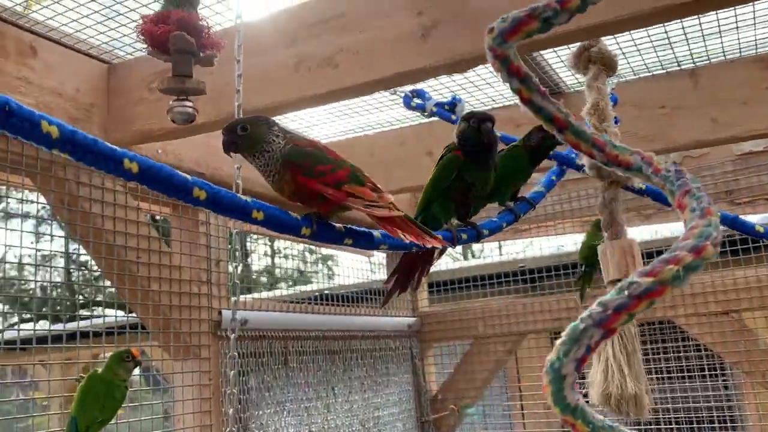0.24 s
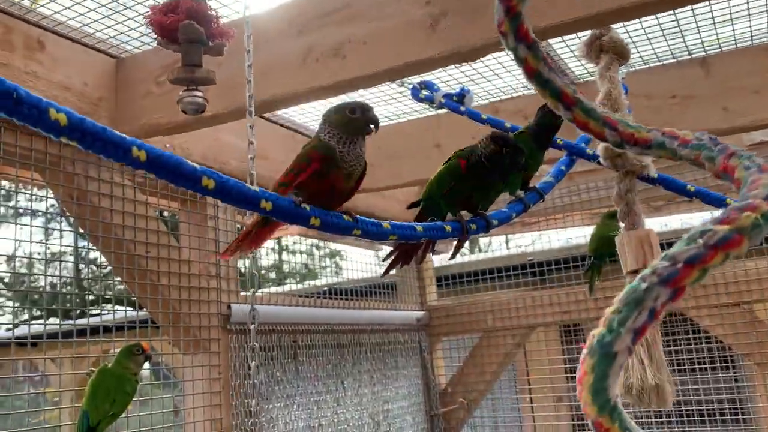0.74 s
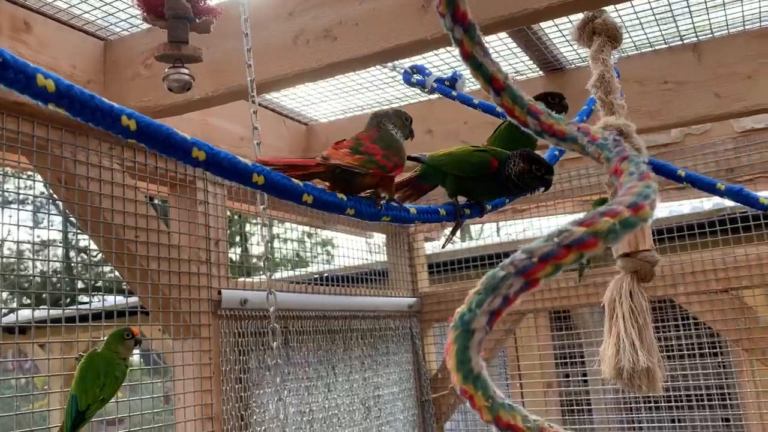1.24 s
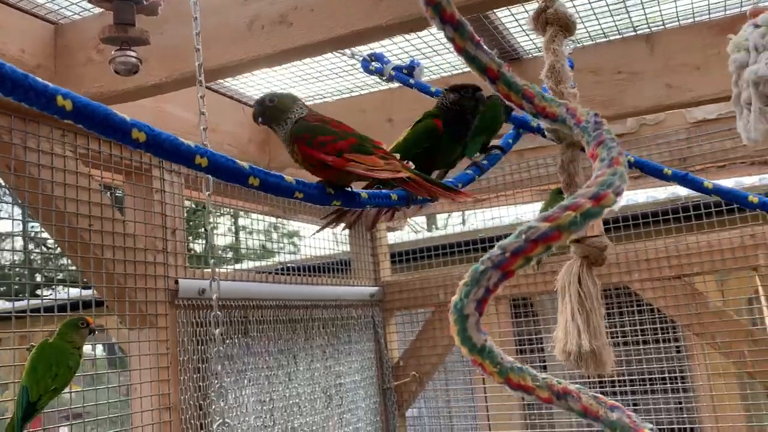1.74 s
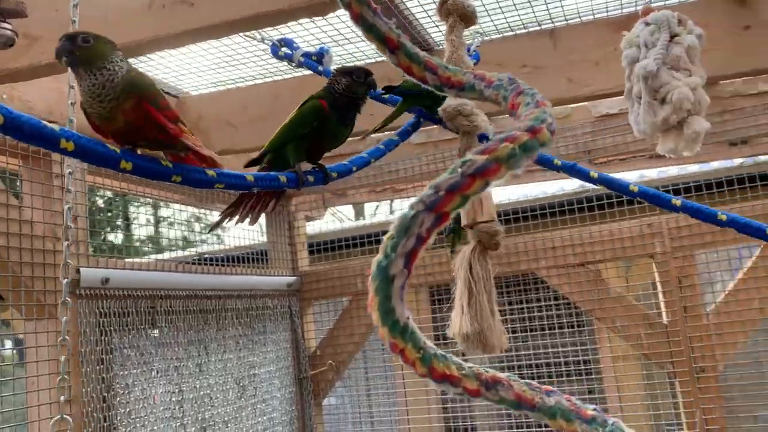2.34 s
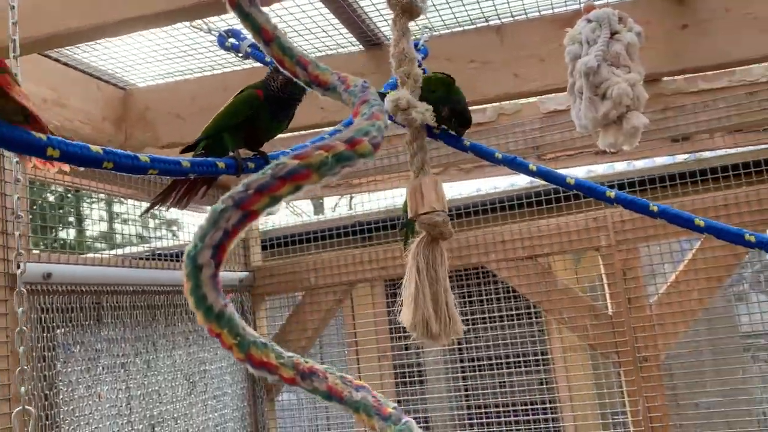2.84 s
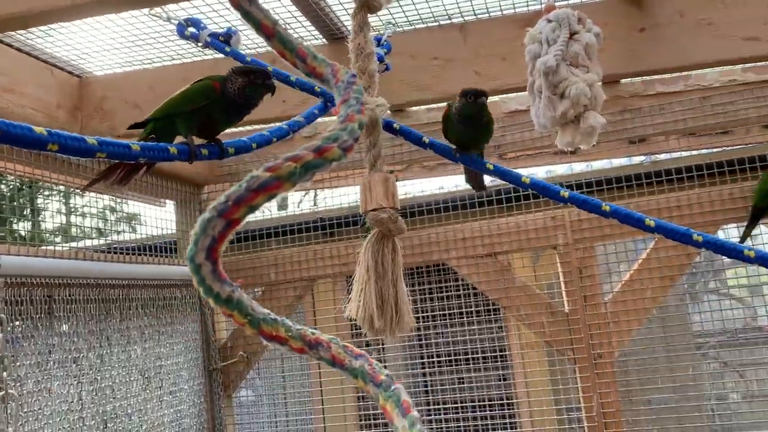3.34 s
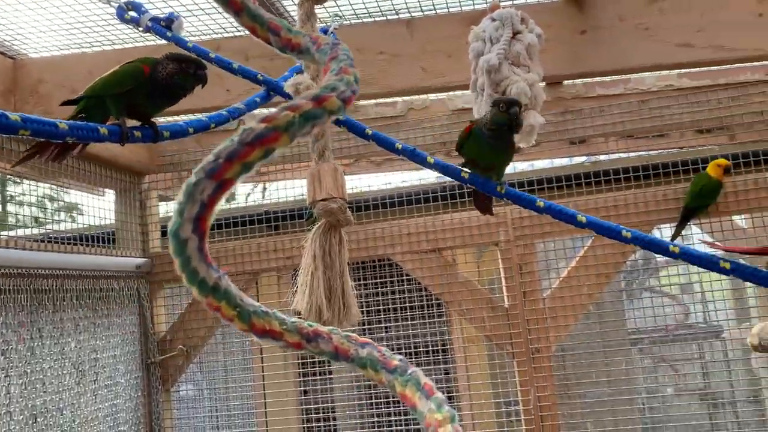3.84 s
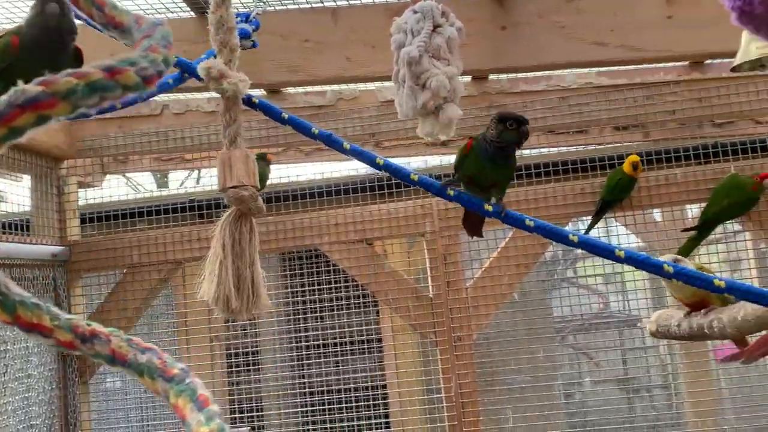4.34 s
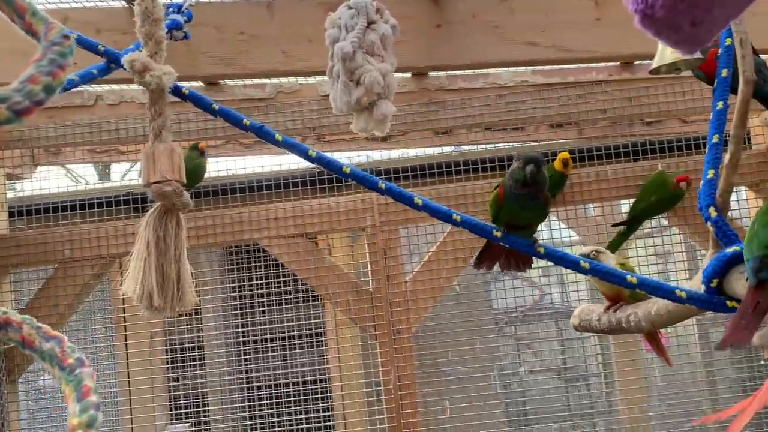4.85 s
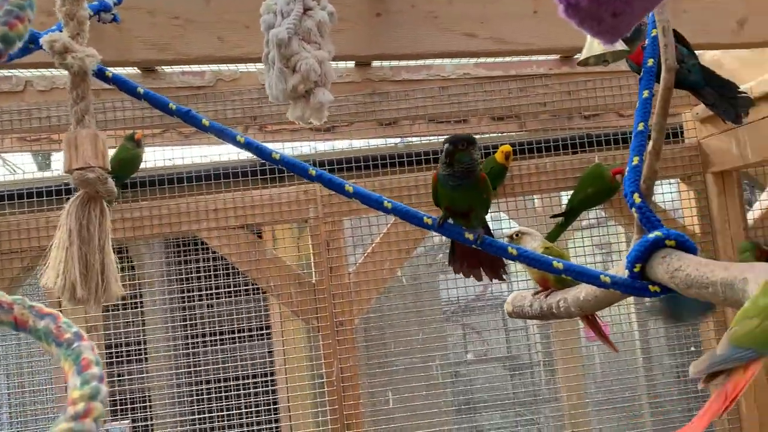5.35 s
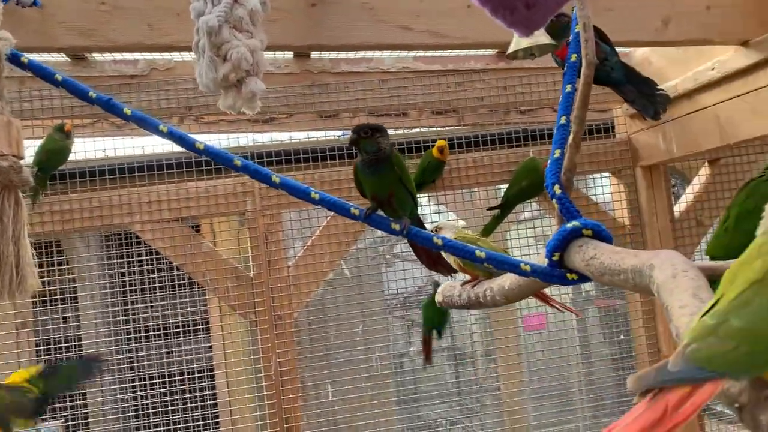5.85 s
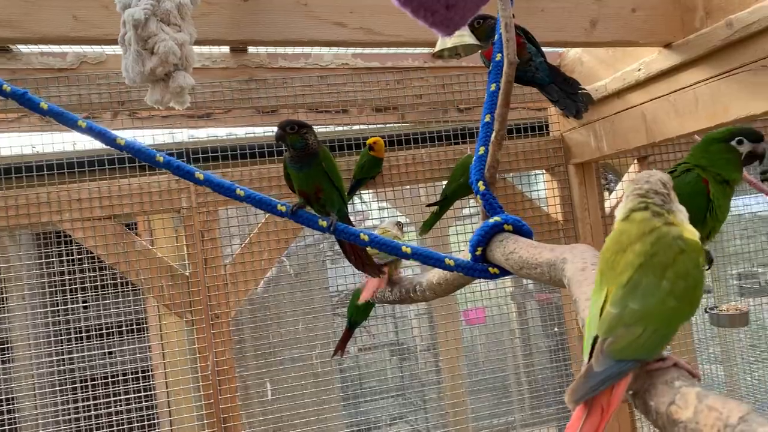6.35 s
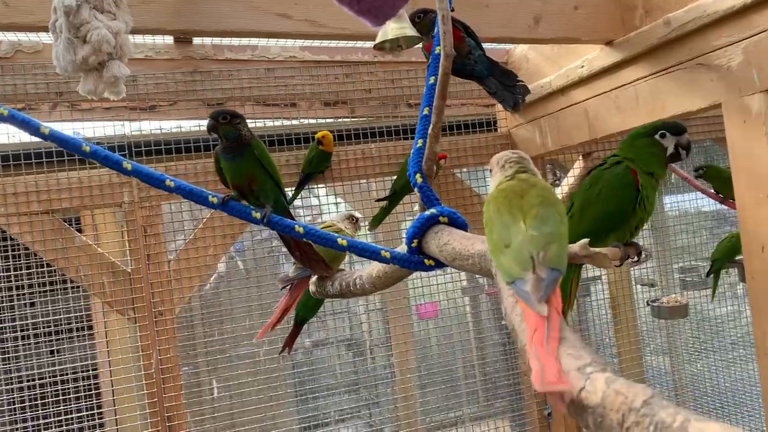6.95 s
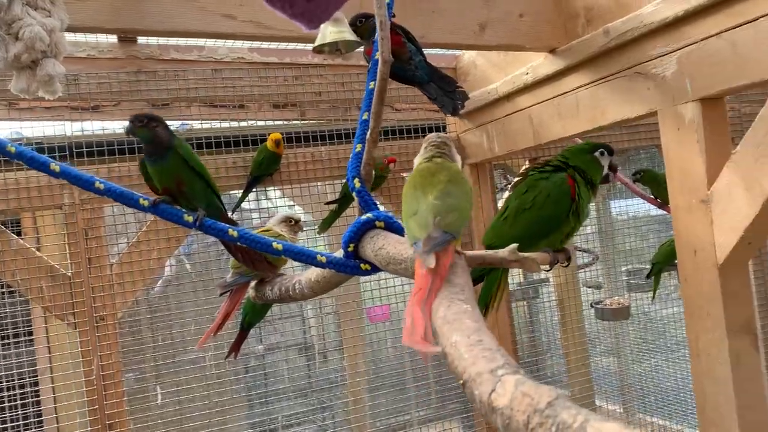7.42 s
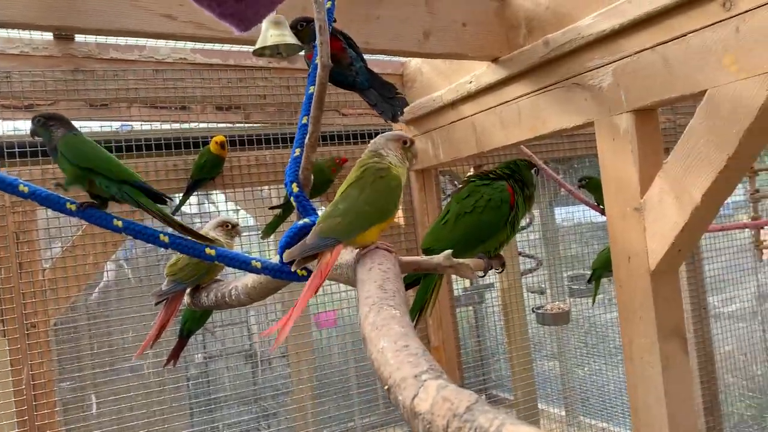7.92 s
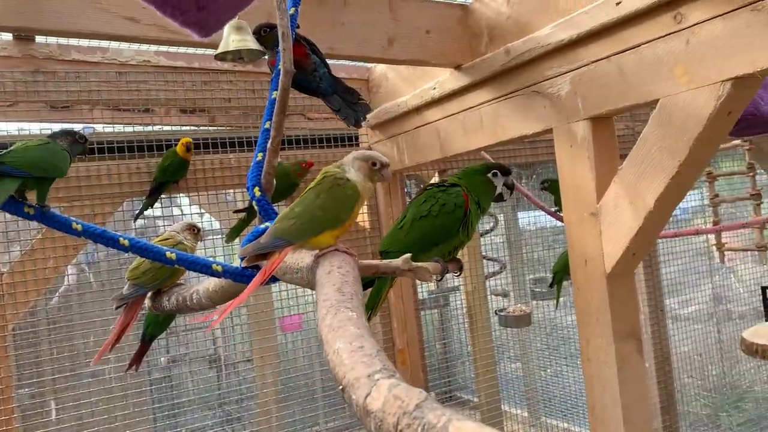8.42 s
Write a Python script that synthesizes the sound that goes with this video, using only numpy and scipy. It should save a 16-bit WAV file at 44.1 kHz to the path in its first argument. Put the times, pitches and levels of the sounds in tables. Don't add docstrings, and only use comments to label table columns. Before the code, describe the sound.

In a timber and mesh aviary, a near parrot gives evenly spaced, arched nasal squawks while another adds clipped stuttering chirps. Fainter birds answer, with squeals, trills and thin peeps crossing. A hoarse bird then rasps in a steady run, and a brief whistle sounds. The near squawks return late, with paired squeals and a second whistle. Handheld stereo, short echo, soft low wind and faint air noise.

```python
import sys
import numpy as np
from scipy import signal
from scipy.fft import rfft, irfft, next_fast_len
from scipy.io import wavfile
from scipy.ndimage import uniform_filter1d

SR = 44100
rng = np.random.default_rng(int(sys.argv[2]) if len(sys.argv) > 2 else 0)


def persist_wave(psi):
    counts = np.round(np.clip(psi, -1, 1) * 32767).astype(np.int16)
    wavfile.write(sys.argv[1], SR, np.atleast_2d(counts).T)


def field_ratio(decibels):
    return 10 ** (np.asarray(decibels, dtype=float) / 20)


N = 382788

# (time [s], level [dB])
WIND_GUSTS = [(0.0, -76), (1.79, -61), (2.05, -77), (3.38, -63), (3.58, -86), (3.62, -55), (3.72, -71),
              (4.23, -62), (4.71, -77.5), (5.53, -64), (5.66, -54.5), (6.31, -76), (7.98, -71.5),
              (8.07, -50.5), (8.12, -75), (8.68, -72.5)]
# (frequency [Hz], density [dB per Hz])
WIND_SPECTRUM = [(12, -23), (20, -16.5), (70, -4), (156, -15), (248, -17), (296, -21), (400, -23),
                 (520, -79.5), (880, -120)]
FLOOR_SPECTRUM = [(120, -38), (200, -13), (2420, -11.5), (2800, -4), (2960, -3.5), (4270, -5),
                  (7410, -57.5), (16000, -45)]
# (time [s], peak level [dB], resonance [Hz])
HAND_BUMPS = [
    (0.697, -47, 92.5),
    (3.641, -44.5, 93),
    (8.059, -40, 89),
]

# (start [s], length [s], crest pitch [Hz], level [dB], crest delay [s])
NEAR_SQUAWKS = [(0.028, 0.24, 800.4, -23.5, 0.12), (0.399, 0.22, 813, -22.5, 0.099),
                (0.766, 0.22, 817, -23, 0.11), (1.149, 0.22, 802.6, -23.5, .12),
                (2.83, 0.23, 813, -23, 0.13), (3.197, 0.24, 831, -21.5, 0.12),
                (6.729, 0.23, 797.5, -23, 0.08), (7.1, .199, 800, -23, 0.076),
                (7.419, 0.2, 799, -22.5, 0.071), (8.15, .227, 816, -22.5, .115),
                (8.517, .21, 818, -22, 0.085)]
FAR_SQUAWKS = [
    (1.529, 0.27, 851.5, -35.5, 0.15),
    (1.88, 0.26, 858, -33, .12),
    (2.239, 0.21, 954, -29.5, .124),
    (3.029, 0.22, 864, -32.5, 0.15),
]
SIDE_SQUAWKS = [
    (2.658, 0.25, 835, -33, 0.1),
    (6.948, 0.24, 793, -32.5, 0.12),
    (7.267, 0.21, 863, -38, 0.089),
    (7.715, .283, 846.3, -29.5, .125),
    (7.818, 0.19, 782, -31, 0.085),
]
HOARSE_SQUAWKS = [(3.548, 0.15, 930.6, -20, 0.086), (3.799, 0.12, 974, -20, 0.11),
                  (4.047, 0.15, 975, -20.5, .074), (4.298, .14, 962, -21, 0.065),
                  (4.55, 0.15, 976.6, -21, 0.063), (4.817, 0.14, 957, -20, 0.061),
                  (5.076, .16, 948, -22, .08), (5.348, 0.17, 934, -22.5, .082),
                  (5.627, 0.17, 892, -21.5, 0.1), (5.907, 0.17, 884.6, -22, 0.054)]
CHIRPS = [(0.686, 0.083, 1287, -16, 0.07), (1.117, 0.087, 1292, -19.5, 0.071),
          (1.908, 0.092, 1248, -18, .06), (2.287, 0.095, 1273, -19.5, 0.044),
          (2.698, 0.097, 1308, -18, 0.062), (3.15, 0.099, 1288, -18.5, 0.049),
          (3.68, 0.082, 1299, -17.5, 0.044), (4.326, 0.082, 1286, -18.5, 0.036),
          (4.668, .1, 1305, -25.5, 0.098), (5.408, 0.089, 1291, -22.5, 0.036),
          (6.218, 0.081, 1283, -23, 0.039), (6.557, 0.096, 1292, -23, 0.059),
          (6.96, 0.2, 1320, -36.5, 0.085), (6.48, 0.11, 1247, -55.5, .045)]
WHISTLES = [
    (3.995, .245, 992, -27.5, 0.085),
    (8.357, 0.23, 987.6, -26, 0.058),
]
SQUEALS = [
    (1.7, 0.082, 2260, -23.5, 0.034),
    (7.126, .088, 2350, -20, 0.035),
    (7.378, 0.085, 2360, -19.5, 0.045),
]
THIN_SQUEALS = [
    (4.452, .083, 2385, -22.5, 0.018),
    (4.7, 0.083, 2230, -25, .028),
]
STRAY_CRIES = [
    (3.445, .1, 2743, -28, 0.055),
    (3.745, .24, 1141, -27, 0.099),
]
# (start [s], length [s], first pitch [Hz], last pitch [Hz], level [dB])
STRAY_GLIDES = [
    (0.225, .12, 2490, 2785, -35.5),
]
TRILLS = [
    (1.83, 0.075, 2217, 2330, -26),
    (2.107, 0.2, 2502, 2132, -25.5),
    (3.077, 0.056, 2210, 2313, -22),
    (5.228, 0.17, 2298, 2100, -22.5),
    (5.827, .055, 2210, 2140, -22.5),
    (5.59, 0.041, 2230, 2290, -34),
]
PEEPS = [
    (1.83, 0.062, 2820, 3250, -32),
    (3.1, 0.07, 3300, 3220, -28),
    (5.79, .045, 2730, 3300, -21.5),
    (5.888, .035, 3054, 2930, -22.5),
    (6.935, 0.046, 2730, 3220, -28),
    (7.022, 0.054, 3090, 3005, -26.5),
    (8.618, 0.041, 3000, 3020, -17.5),
]
SCREAMS = [
    (1.738, 0.022, 7150, 6160, -28.5),
    (3.124, 0.019, 6700, 4920, -27),
    (4.003, 0.018, 6300, 6400, -22),
    (4.02, 0.028, 6840, 5680, -20),
]

NEAR_ARCH = dict(first=0.54, first_db=-8.5, rise_s=.049, risen=0.94, risen_db=-1.5, fall_s=.052, falling=.94, falling_db=-1, last=0.53, last_db=-5.5)
FAR_ARCH = dict(first=.59, first_db=-13.5, rise_s=.048, risen=.83, risen_db=-2.5, fall_s=0.043, falling=.91, falling_db=1.5, last=0.45, last_db=1)
SIDE_ARCH = dict(first=0.56, first_db=-12.5, rise_s=0.074, risen=.94, risen_db=-0.5, fall_s=.05, falling=.92, falling_db=-2.7, last=0.67, last_db=-2)
HOARSE_ARCH = dict(first=.6, first_db=-10, rise_s=0.032, risen=.92, risen_db=-2.7, fall_s=.033, falling=.91, falling_db=-5, last=0.56, last_db=-5.5)
CHIRP_ARCH = dict(first=.87, rise_s=.034, risen=.985, fall_s=.012, falling=1.008, last=1.012, first_db=-12, risen_db=1.5, falling_db=-2.5, last_db=-12)
WHISTLE_ARCH = dict(first=1.01, rise_s=.02, risen=1.004, fall_s=.03, falling=.97, last=.88, first_db=-5, risen_db=-3, falling_db=1.5, last_db=-4)
SQUEAL_ARCH = dict(first=.6, first_db=-3, rise_s=.024, risen=.85, risen_db=-1.5, fall_s=.035, falling=.9, falling_db=0, last=.57, last_db=-5)
STRAY_ARCH = dict(first=.75, rise_s=.03, risen=.94, fall_s=.035, falling=.92, last=.75, first_db=-5, risen_db=-1.5, falling_db=-1.5, last_db=-8)

# (frequency [Hz], gain [dB])
NEAR_THROAT = [(900, -14), (1600, -4), (2400, -7.5), (3200, -2), (4100, -8), (4900, -6), (5800, -10),
               (8000, -12), (10500, -18), (15500, -31)]
FAR_THROAT = [(900, -7), (1700, 2), (3400, -1.5), (5200, -4), (8000, -10.5), (11000, -16.5), (15500, -32)]
HOARSE_THROAT = [(600, -29), (1100, -1.5), (1900, -2), (3600, 0), (4500, 4.5), (5600, -7.5), (6600, 5),
                 (7600, -10), (11000, -10.5), (15500, -20)]
CHIRP_THROAT = [(1300, -28.5), (2600, -12), (3900, -6), (5200, 1), (6500, -17), (7800, -9), (10400, -11.5),
                (15500, -29.5)]
SHRILL_THROAT = [(1200, -21), (2300, -10.5), (4500, -1.5), (6600, -5), (9000, -2), (12000, -12),
                 (15500, -22)]
WHISTLE_THROAT = [(1000, -30), (2000, -17), (4000, -2), (6000, -5), (15500, -23)]
SQUEAL_THROAT = [(1200, -17), (2500, -3.5), (3300, 5.5), (4500, -4), (6500, -8.5), (9000, -6), (15500, -27)]
STRAY_THROAT = [(1100, -13.5), (2300, 2.5), (3200, -11), (5000, -6), (6500, -17.5), (15500, -19)]
PEEP_THROAT = [(2500, -13.5), (3100, 7), (6200, -3), (9500, 0), (15500, -23)]

# (time [s], delay of left behind right [ms])
PERCH_LAG = [(0, 0.4), (4.501, 0.45), (7.499, 0.37), (7.899, 0.15), (8.6, 0.033)]
HOARSE_LAG = [(3.599, 0.414), (5.7, 0.311)]
CHIRPER_LAG = [(.7, 0.11), (1.1, -0.081), (2.3, -0.16), (3.204, -0.39), (4.298, -0.42), (6.6, -0.44),
               (7.0, -0.017)]
WHISTLER_LAG = [(4.0, -0.18), (8.4, -0.23)]


def at_hz(points, hz):
    point_hz, point_db = np.array(points).T
    return np.interp(np.log(hz), np.log(point_hz), point_db)


def rms_one(x):
    return x / np.sqrt(np.mean(x ** 2) + 1e-20)


def coloured(spectrum, alike):
    size = next_fast_len(N)
    mid, side = rng.standard_normal((2, size))
    pair = np.sqrt(1 + alike) * mid + np.sqrt(1 - alike) * side * np.array([[1], [-1]])
    hz = np.fft.rfftfreq(size, 1 / SR) + 1
    return rms_one(irfft(rfft(pair) * field_ratio(at_hz(spectrum, hz)), size)[:, :N])


def outdoor_floor():
    return field_ratio(-62.5) * coloured(FLOOR_SPECTRUM, alike=0.1)


def wind():
    t = np.arange(N) / SR
    eddies = np.interp(t * 12, np.arange(110), rng.standard_normal(110))
    gusts = field_ratio(np.interp(t, *np.transpose(WIND_GUSTS)))
    return coloured(WIND_SPECTRUM, alike=0.95) * field_ratio(0.83 * eddies) * gusts


def hand_bumps():
    t = np.arange(N) / SR
    out = np.zeros(N)
    for s, peak_db, hz in HAND_BUMPS:
        age = np.clip(t - s, 0, None)
        decay = field_ratio(peak_db - 60 * age / 0.058)
        settling = 1 + 1.1 * np.exp(-age / 0.0053)
        out += decay * np.sin(2 * np.pi * hz * age * settling)
    return out


def aviary(x):
    early_t60_s, tail_t60_s, tail_db = 0.043, 0.22, -3
    t = np.arange(SR // 2) / SR
    early = rms_one(field_ratio(-60 * t / early_t60_s) * (t > .004))
    late = rms_one(field_ratio(-60 * t / tail_t60_s) * (t > .02)) * field_ratio(tail_db)
    echoes = rng.standard_normal((2, len(t))) * (early + late) / np.sqrt(len(t))
    echoes = signal.lfilter([1, .45], [1.3], echoes)
    return signal.fftconvolve(x, echoes, axes=1)[:, :N]


def arches(calls, first, first_db, rise_s, risen, risen_db, fall_s, falling, falling_db, last, last_db):
    bow = .75
    risen_bow = 1 - (1 - bow) * (1 - risen)
    falling_bow = 1 - (1 - bow) * (1 - falling)
    shares = np.array([first, risen, risen_bow, 1, falling_bow, falling, last])
    drops_db = np.array([first_db, risen_db, risen_db / 2, 0, falling_db / 2, falling_db, last_db])
    out = []
    for s, length, hz, db, crest_s in calls:
        up_s = min(rise_s, .9 * crest_s)
        down_s = max(length - fall_s, crest_s + .002)
        times = np.array([0, up_s, (up_s + crest_s) / 2, crest_s, (crest_s + down_s) / 2, down_s, length])
        out.append(np.transpose([s + times, hz * shares, db + drops_db]))
    return out


def glides(calls):
    share = np.array([0, .45, .8, 1])
    drops_db = np.array([-6, 0, 0, -6.5])
    out = []
    for s, length, first_hz, last_hz, db in calls:
        hz = first_hz + share * (last_hz - first_hz)
        out.append(np.transpose([s + share * length, hz, db + drops_db]))
    return out


def wobble(size, rate_hz):
    step = 8
    r = np.exp(-2 * np.pi * step * rate_hz / SR)
    noise = rng.standard_normal(N // step // 16 + 400)
    slow = signal.lfilter([1], [1, -2 * r, r * r], noise)[400:]
    return np.interp(np.arange(size) / step, np.arange(len(slow)), rms_one(slow))


def call(rows, throat, jitter, flutter_db, odd_db, rasp_db, trill, stutter, squawk, chest_db):
    s, pitch_hz, level_db = np.transpose(rows)
    t = np.arange(s[0] - .012 * squawk, s[-1] + 0.016 * squawk, 1 / SR)
    soften = SR // 120

    droop = np.clip(s[0] - t, 0, 1) + np.clip(t - s[-1], 0, 1)
    hz = uniform_filter1d(np.interp(t, s, pitch_hz) * (1 - 11 * droop), soften, mode="nearest")
    slack = squawk * (1 - hz / hz.max())
    shake = np.sin(2 * np.pi * 86 * (t - s[0]))
    cycle = 2 * np.pi * np.cumsum(hz * (1 + 0.045 * trill * shake)) / SR
    drift_hz = hz * (jitter + .8 * slack ** 2) * wobble(len(t), 300)
    unsteady = 2 * np.pi * np.cumsum(drift_hz) / SR
    phase = cycle + unsteady

    tone = 0
    for k in range(1 + squawk, int(16000 / pitch_hz.min())):
        gain_db = at_hz(throat, k * hz) + odd_db * (k % 2) + flutter_db * wobble(len(t), 76)
        partial = np.sin(k * phase + rng.uniform(0, 2 * np.pi))
        tone = tone + field_ratio(gain_db) * (k * hz < 16500) * partial
    evened = tone / np.sqrt(uniform_filter1d(tone ** 2, 3 * soften, mode="reflect") + 1e-12)

    pulsed = rng.standard_normal(len(t)) * (1 + 0.9 * np.cos(phase))
    size = next_fast_len(len(t))
    throat_gain = field_ratio(at_hz(throat, np.fft.rfftfreq(size, 1 / SR) + 1))
    rasp = irfft(rfft(pulsed, size) * throat_gain, size)[:len(t)]
    voice = evened + field_ratio(rasp_db + 24 * slack) * rms_one(rasp)

    chest_gain = field_ratio(chest_db + 1.6 * slack + 2.9 * wobble(len(t), 41))
    voice = voice + squawk * chest_gain * np.sin(cycle + .5 * unsteady)

    age = t - t[0]
    onset = np.clip(age / (0.00063 + 0.018 * squawk), 0, 1)
    release = np.clip((t[-1] - t) / (0.0018 + 0.043 * squawk), 0, 1)
    catches = np.exp(-((age - .017) / .005) ** 2)
    contour_db = np.interp(t, s, level_db) - 7 * trill * shake - stutter * 8 * catches
    return voice * onset * release * field_ratio(contour_db)


def bird(calls, throat, lags, pan_db, echo_db, jitter, flutter_db, rasp_db,
         odd_db=0, trill=0, stutter=0, squawk=0, chest_db=0):
    out = np.zeros((2, N + SR))
    for rows in calls:
        cry = call(rows, throat, jitter, flutter_db, odd_db, rasp_db, trill, stutter, squawk, chest_db)
        cry = np.pad(cry, 64)
        size = next_fast_len(len(cry))
        start_s = rows[0][0]
        lag_s = np.interp(start_s, *np.transpose(lags)) / 1000
        turn = np.pi * np.fft.rfftfreq(size, 1 / SR) * lag_s * np.array([[-1], [1]])
        at = max(round((start_s - 0.014 * squawk) * SR) - 64, 0)
        out[:, at:at + size] += irfft(rfft(cry, size) * np.exp(1j * turn), size)
    direct = out[:, :N] * field_ratio(np.array([[pan_db / 2], [-pan_db / 2]]))
    return np.array([direct, direct * field_ratio(echo_db)])


def parrots():
    far = arches(FAR_SQUAWKS, **FAR_ARCH) + arches(SIDE_SQUAWKS, **SIDE_ARCH)
    strays = arches(STRAY_CRIES, **STRAY_ARCH) + glides(STRAY_GLIDES)
    flock = bird(far, FAR_THROAT, PERCH_LAG, pan_db=0.7, echo_db=-5, jitter=0.0078,
                 flutter_db=5.5, rasp_db=-25.5, squawk=1, chest_db=-19.5)
    flock += bird(strays, STRAY_THROAT, PERCH_LAG, pan_db=.6, echo_db=-6, jitter=.018,
                  flutter_db=4.5, rasp_db=-12)
    flock += bird(glides(PEEPS + SCREAMS), PEEP_THROAT, WHISTLER_LAG, pan_db=.4, echo_db=-7, jitter=.012,
                  flutter_db=4, rasp_db=-14)
    flock += bird(arches(SQUEALS, **SQUEAL_ARCH), SQUEAL_THROAT, PERCH_LAG, pan_db=.4, echo_db=-10,
                  jitter=.016, flutter_db=3.5, rasp_db=-16)
    flock += bird(arches(THIN_SQUEALS, **SQUEAL_ARCH), SQUEAL_THROAT, PERCH_LAG, pan_db=.4, echo_db=-8,
                  jitter=.02, flutter_db=3.5, rasp_db=-12, odd_db=-14)
    flock += bird(arches(WHISTLES, **WHISTLE_ARCH), WHISTLE_THROAT, WHISTLER_LAG, pan_db=1.2, echo_db=-12,
                  jitter=.005, flutter_db=4, rasp_db=-24, odd_db=-11)
    flock += bird(glides(TRILLS), SHRILL_THROAT, PERCH_LAG, pan_db=1.2, echo_db=-5, jitter=.006,
                  flutter_db=3.5, rasp_db=-17, odd_db=-4, trill=1)
    flock += bird(arches(CHIRPS, **CHIRP_ARCH), CHIRP_THROAT, CHIRPER_LAG, pan_db=.8, echo_db=-10,
                  jitter=.011, flutter_db=4, rasp_db=-21, stutter=1)
    flock += bird(arches(HOARSE_SQUAWKS, **HOARSE_ARCH), HOARSE_THROAT, HOARSE_LAG, pan_db=-1.1, echo_db=-6,
                  jitter=.014, flutter_db=5.5, rasp_db=-14, squawk=1, chest_db=-18, odd_db=-4)
    flock += bird(arches(NEAR_SQUAWKS, **NEAR_ARCH), NEAR_THROAT, PERCH_LAG, pan_db=0.46, echo_db=-8,
                  jitter=0.003, flutter_db=3, rasp_db=-35, squawk=1, chest_db=-24)
    return signal.sosfilt(signal.butter(4, 400, "high", fs=SR, output="sos"), flock)


def scene():
    direct, to_walls = parrots()
    return outdoor_floor() + wind() + hand_bumps() + aviary(to_walls) + direct


def band_limit(x):
    return signal.sosfilt(signal.butter(12, 17070, fs=SR, output="sos"), x)


def record(dry):
    size = next_fast_len(N)
    hz = np.fft.rfftfreq(size, 1 / SR)
    top_cut = field_ratio(-45 * np.clip((hz - 15750) / 400, 0, 1))
    left, right = rfft(dry, size) * top_cut
    shared = .998 * np.clip((hz - 6600) / 900, 0, 1)
    turn = np.pi * (1 - (hz - 8850) / 2290)
    turn = turn - .5 * np.sin(2 * turn)
    right = shared * left * np.exp(-1j * turn) + np.sqrt(1 - shared ** 2) * right
    mix = irfft(np.array([left, right]), size)[:, :N]
    return band_limit(mix)


dry = scene()
out = record(dry)
persist_wave(out)
```